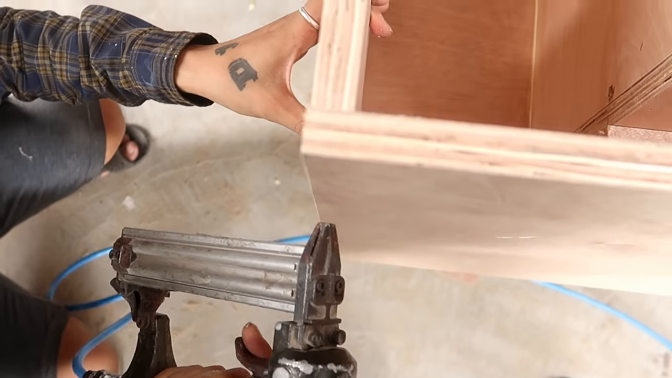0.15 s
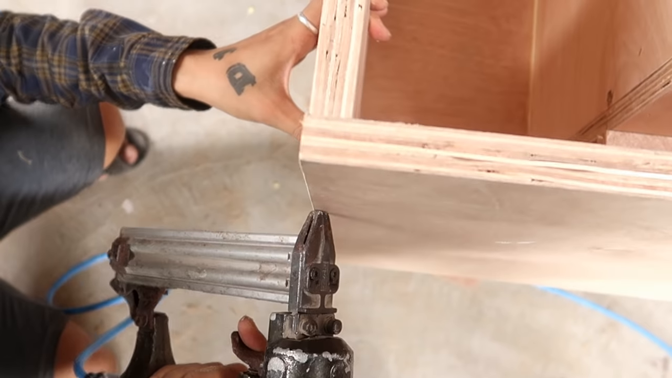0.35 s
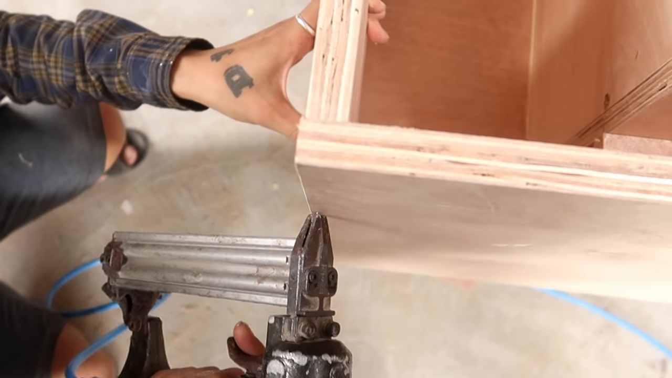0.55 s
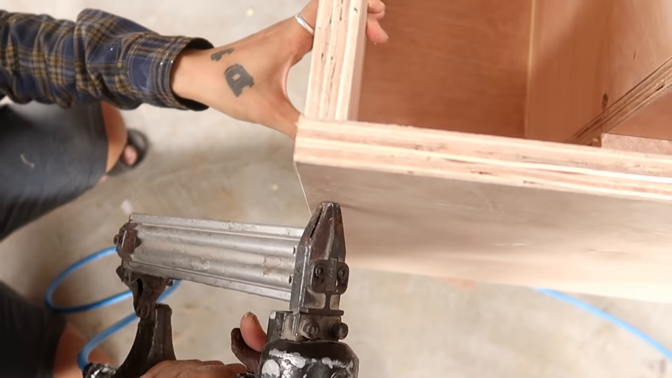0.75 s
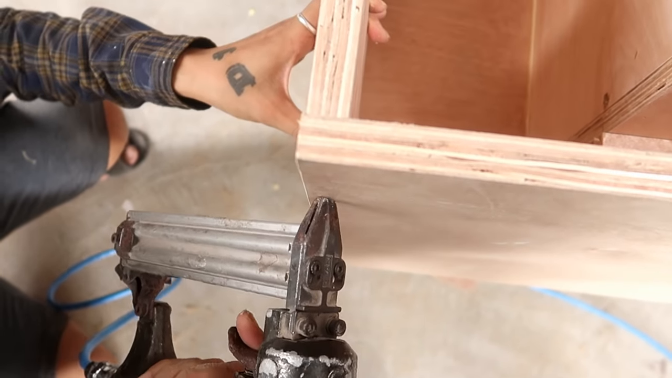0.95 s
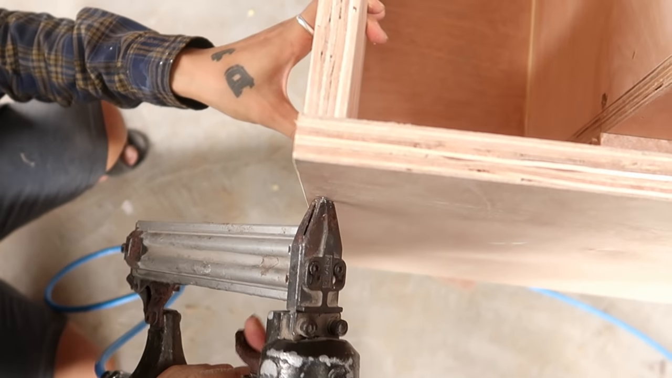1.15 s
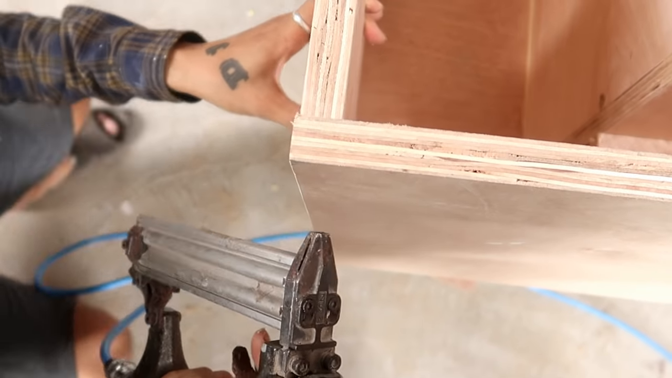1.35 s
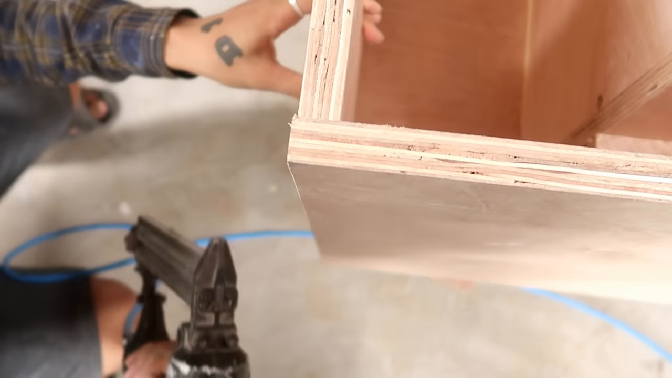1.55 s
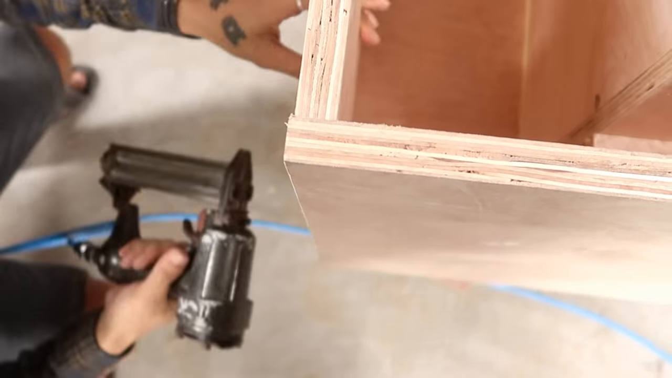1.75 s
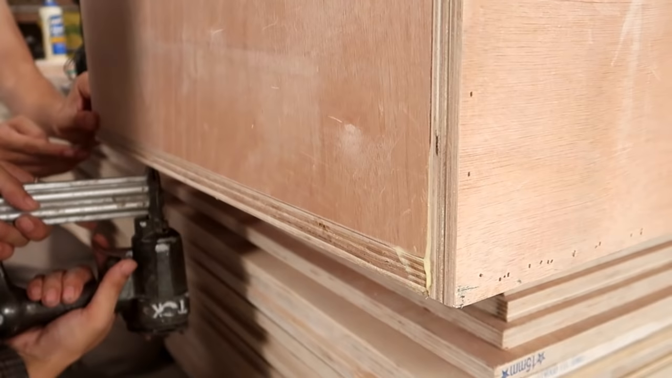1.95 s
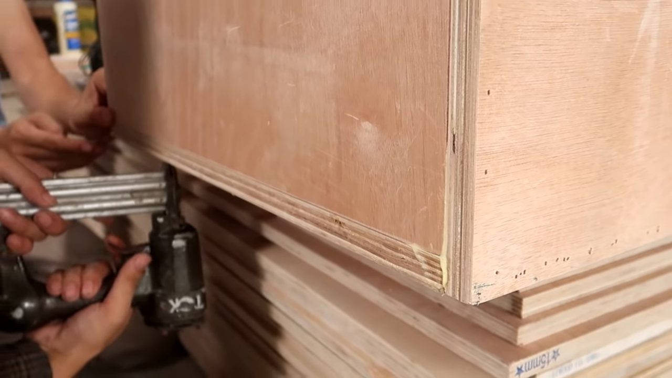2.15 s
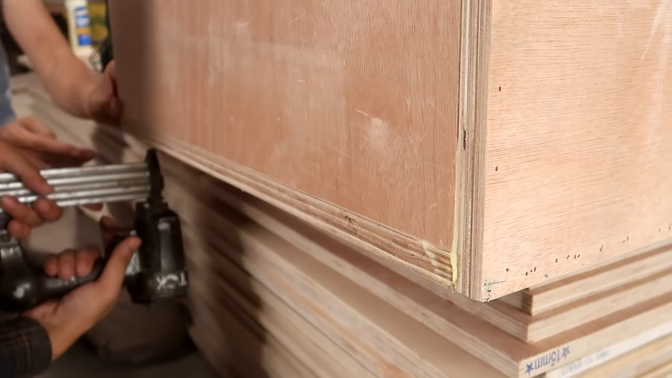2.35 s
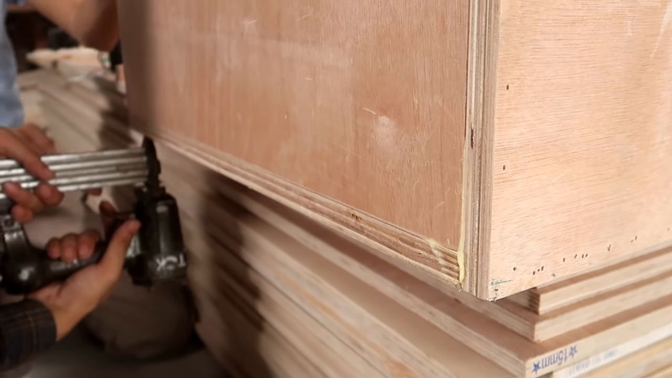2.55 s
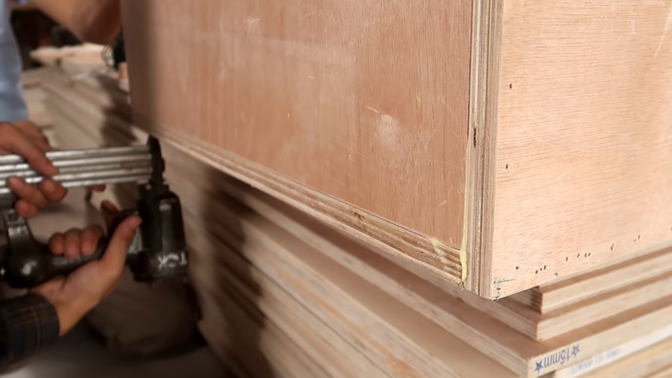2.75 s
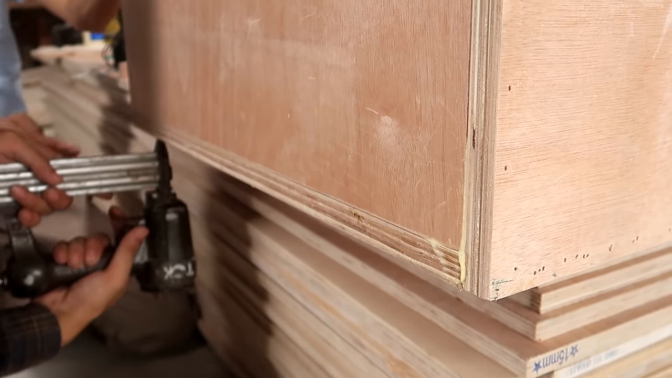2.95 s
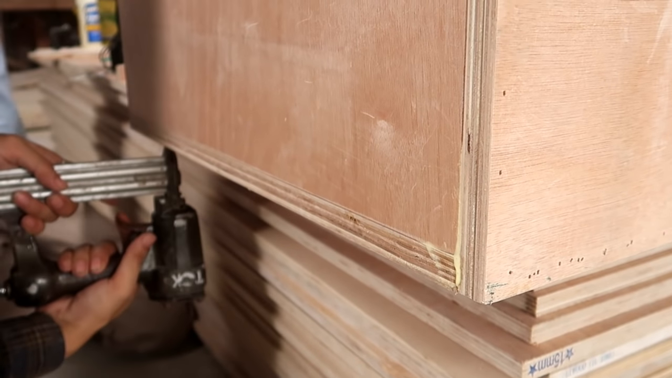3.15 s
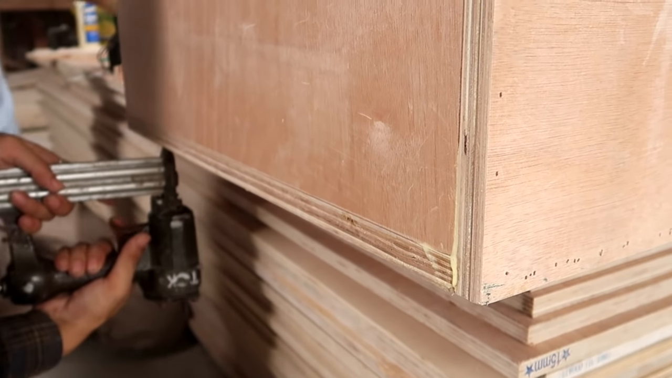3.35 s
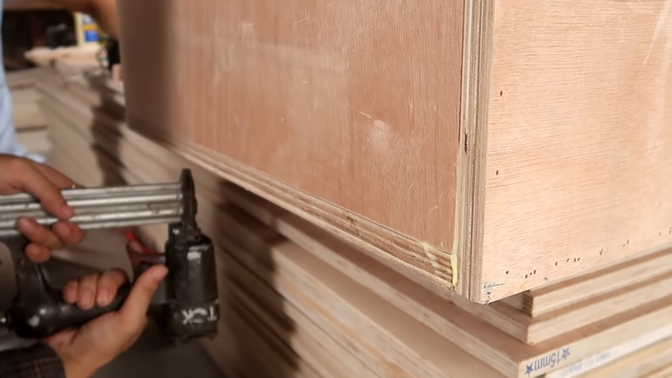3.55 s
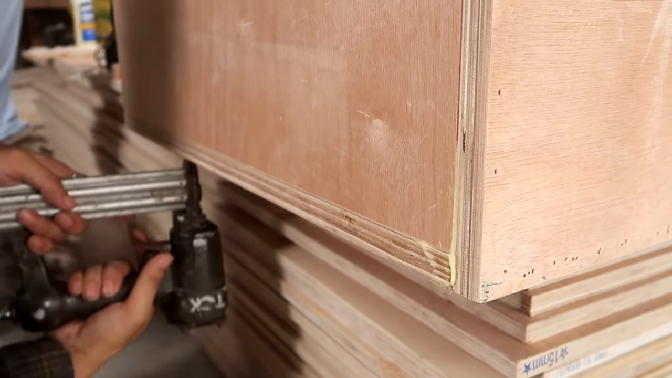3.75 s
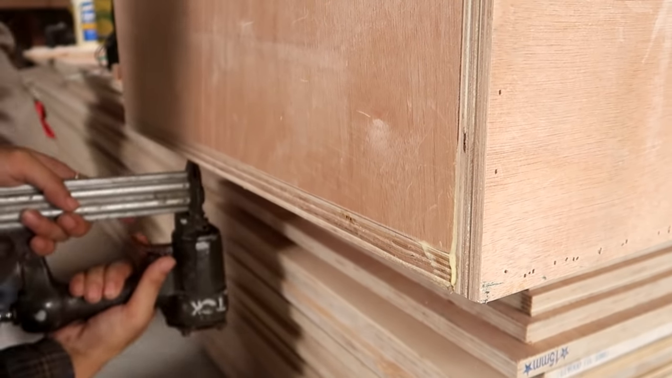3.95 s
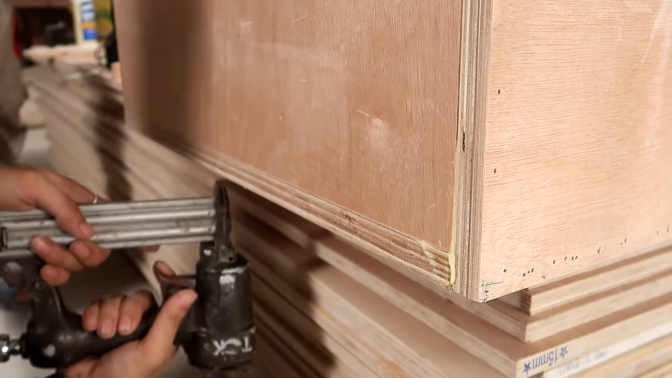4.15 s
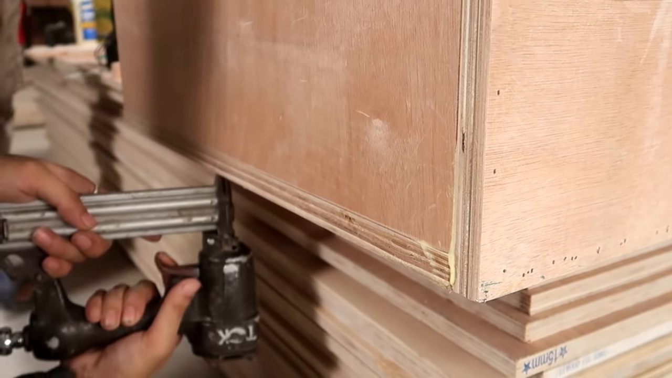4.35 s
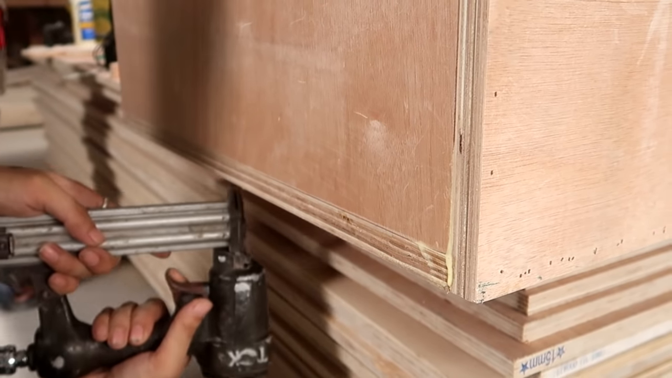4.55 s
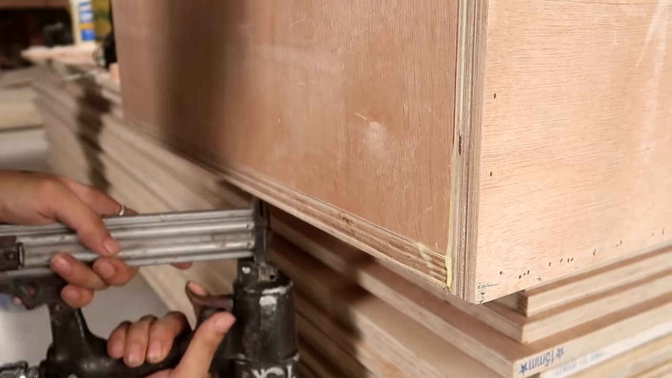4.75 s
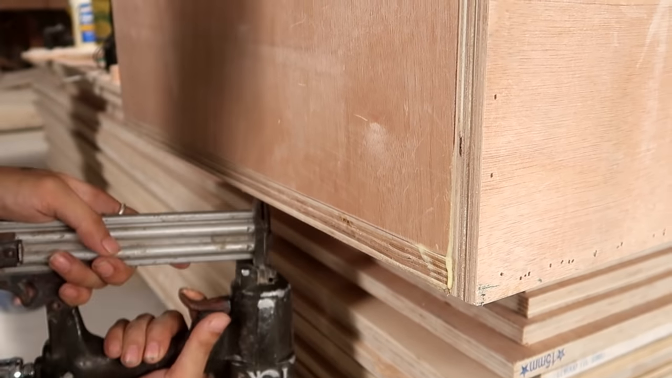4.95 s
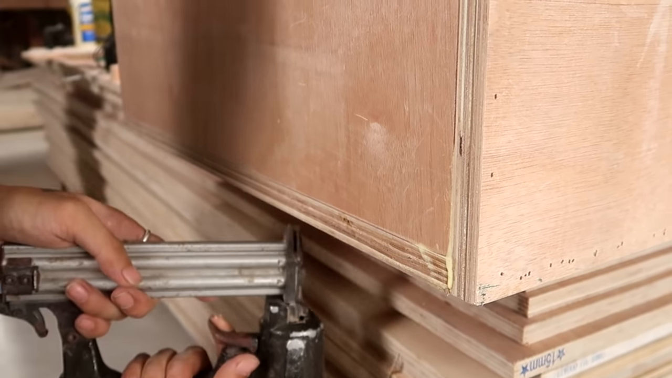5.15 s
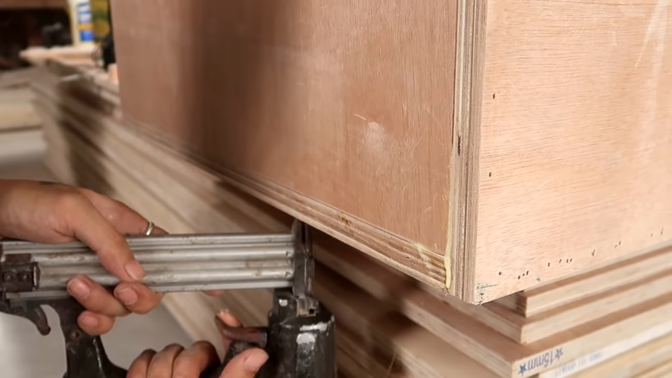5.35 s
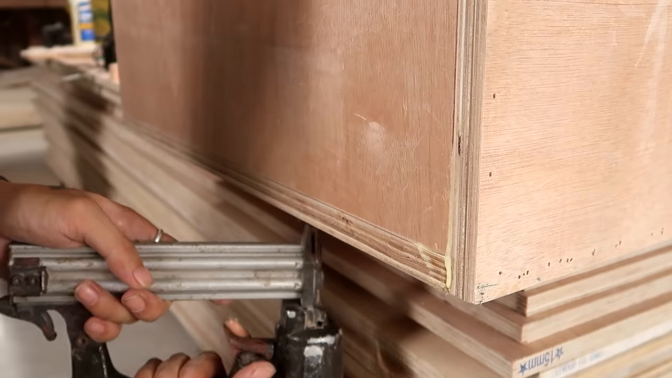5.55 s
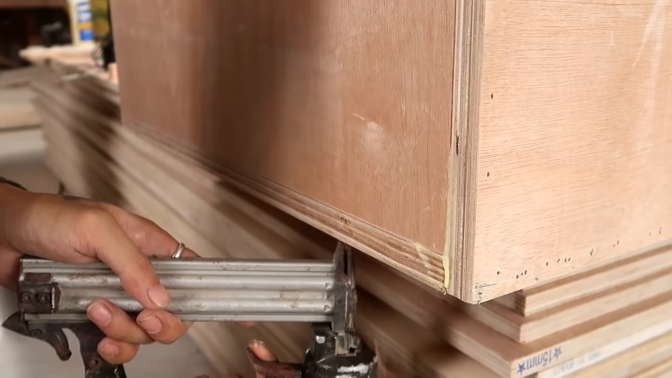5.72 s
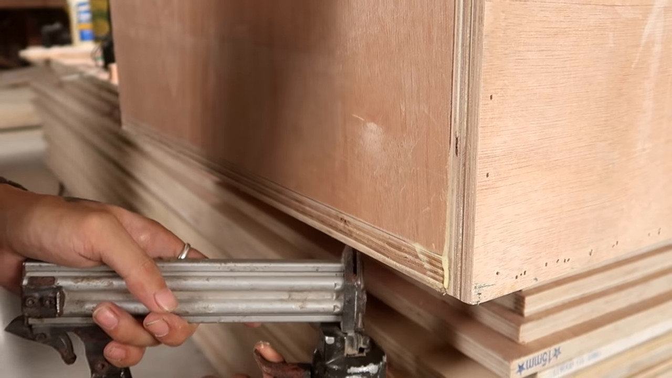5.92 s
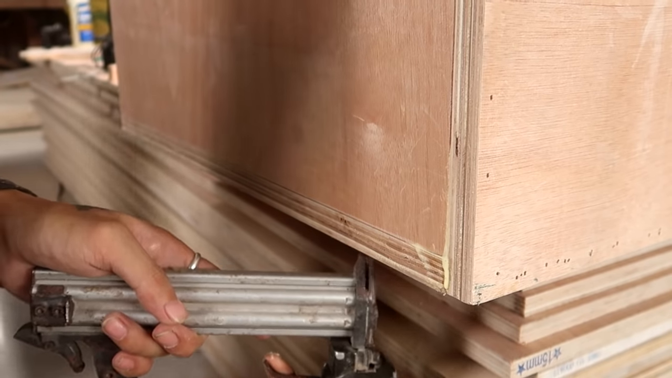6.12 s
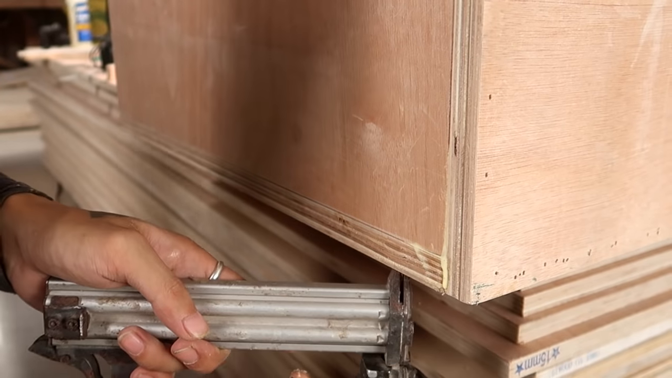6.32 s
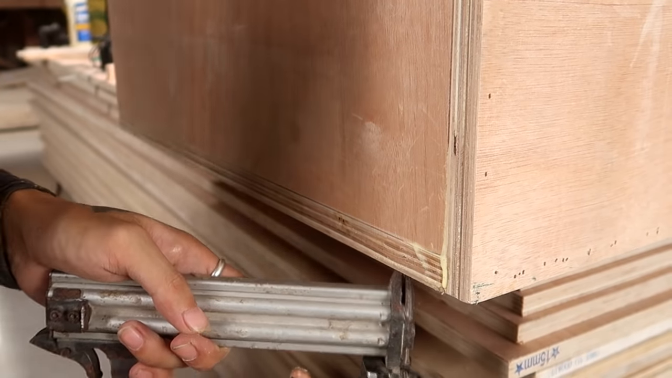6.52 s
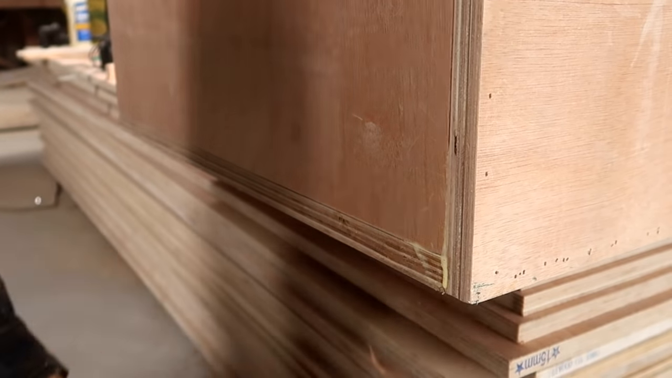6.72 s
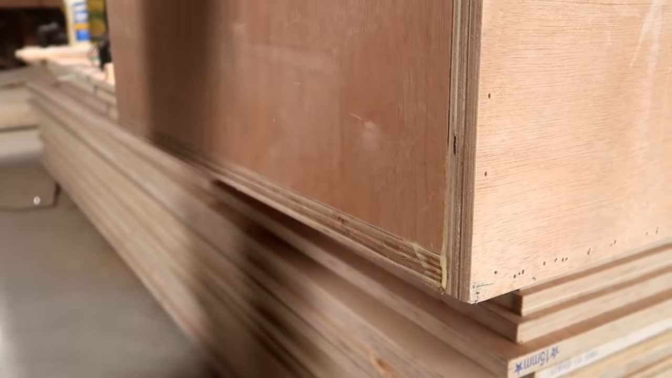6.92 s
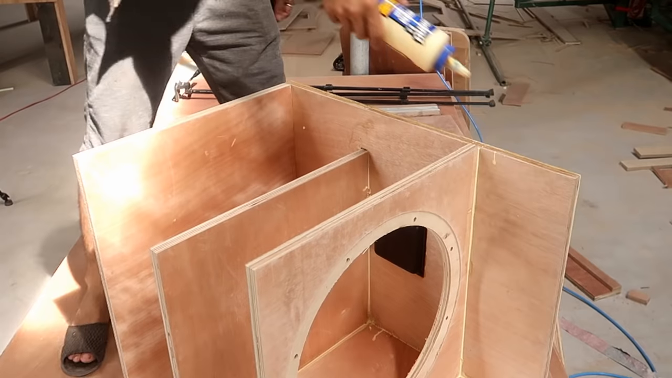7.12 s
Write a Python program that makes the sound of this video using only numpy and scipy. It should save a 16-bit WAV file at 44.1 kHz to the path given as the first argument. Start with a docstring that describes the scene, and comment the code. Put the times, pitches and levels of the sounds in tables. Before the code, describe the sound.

Pneumatic nail gun shots, roughly two a second, slam into plywood, each with a short hiss and a knocking air release, ringing through a large hall.

```python
"""Over faint shop hum a short hiss runs straight into the crack of an air nailer, close to a phone.
Twelve brads go into the edge of a plywood box in a large workshop. Each shot: the valve hisses, the driver
slams home and bounces, then the trigger is let go, air puffs out and the piston knocks back.
Wood and metal are decaying sines, air is shaped noise, and the hall is noise that follows their energy.
Small knocks, scrapes, faint hisses, gusts on the two microphone ports and a jolt of the phone lie around."""
import sys
import numpy as np
from scipy import signal
from scipy.fft import rfft, irfft
from scipy.io import wavfile
from scipy.ndimage import uniform_filter1d

SR = 44100
rng = np.random.default_rng(int(sys.argv[2]) if len(sys.argv) > 2 else 0)


def to_wav(sig):
    """Store sig (one row per channel, or 1-D mono) as 16-bit WAV at the path in sys.argv[1].

    Samples outside -1..1 are clipped; the rate is SR.
    """
    pcm = np.clip(np.atleast_2d(sig), -1, 1) * 32767
    pcm = np.round(pcm).astype(np.int16)
    wavfile.write(sys.argv[1], SR, pcm.T)  # frames by channels


N = 321048
T = np.arange(N) / SR

# driver blows: t/s, blow level/dB, left minus right/dB, lower spot ring f/Hz, its level/dB, # upper spot ring
# f/Hz, its level/dB, valve hiss level/dB, brightness/dB per octave, panel thud level/dB, # box ring level/dB,
# rebound delay/ms, rebound level/dB, first tick level/dB
SHOTS = [(0.0173, 4.5, -1.5, 1230, -11, 3100, 2, -26.5, 9.5, -47, 4, 2.4, 0, -9),
         (0.599, 2.5, 0, 1190, -2.5, 3410, -4, -31, 3, -39.5, -3, 2.42, -5.5, -12),
         (1.201, -1.5, 11, 836, -4, 2920, -8, -33, 1.5, -5, 2.5, 2.3, -4, -10.5),
         (2.2267, 4, 9.5, 890, -0.5, 3030, -0.5, -16, -1, -33, 5, 2.3, -6, -24),
         (2.9069, 1, 15, 1070, -1.5, 1980, 1, -21.5, 2.5, -39.5, -7, 2.18, -0.5, -18),
         (3.445, -1, -3.5, 1010, 0, 3060, 3, -23.5, 3, -34, -1.5, 1.78, -7, -17.5),
         (3.9937, 2.5, 6, 1050, 4.5, 2270, 2, -24.5, -1.5, -31, -6.5, 2.1, -3.5, -23),
         (4.542, -10.5, -2.5, 1700, 6.5, 2870, 7, -28.5, -0.5, -30.5, -9.5, 3, -3.5, 1),
         (5.058, 0, -7.5, 1017, -1, 2190, 1, -28.5, -1.5, -32, -3.5, 2.1, -10, -23),
         (5.582, -5.5, -6.5, 1350, -7, 2330, 3.5, -28, 0, -12, 0.5, 2.25, -6, -13),
         (6.14, 3, 2, 1320, 3, 2280, 0, -25, 1, -19, -0.5, 2.38, -7, -16),
         (6.573, 0.5, -8.5, 1385, 1, 1980, -10, -27, 4, -22, 2.5, 2.28, -7, -25)]
# modes of box and gun body: f/Hz, level/dB, t60/s (before scatter from blow to blow)
BODY_MODES = [(257, -13, 0.081), (462, -4.5, 0.022), (916, 1.5, 0.043), (1205, 1, 0.014), (1400, -1, 0.066),
              (2100, -10, 0.0057), (2120, -8, 0.013), (3020, -11, 0.01), (3630, -11, 0.016),
              (4500, -16.5, 0.0037), (5030, -11, 0.008)]
SEEP_DB, SEEP_S = -15, 0.0069  # air seeps past the seal just before valve or port opens
KNOCK_LAG_MS_PER_DB = 0.23  # the louder port hears knocks and thumps earlier


def undb(db):
    """Amplitude ratio of a level in dB."""
    return 10 ** (np.asarray(db) / 20)


def curve(table):
    """Gain at every sample from t/s, level/dB rows."""
    return undb(np.interp(T, *np.transpose(table)))


def colour(x, points):
    """Shape the spectrum along the last axis by f/Hz, level/dB points, then scale to rms 1."""
    hz, db = np.transpose(points)
    f = np.maximum(np.fft.rfftfreq(x.shape[-1], 1 / SR), 1)
    gain = undb(np.interp(np.log(f), np.log(hz), db))
    y = irfft(rfft(x) * gain, x.shape[-1])
    return y / np.sqrt(np.mean(y ** 2))


def ring(t, hz, t60, phase=0.):
    """A mode struck at t = 0: a sine that falls 60 dB in t60 seconds."""
    decay = undb(-60 * np.maximum(t, 0) / t60)
    return (t >= 0) * np.sin(2 * np.pi * hz * t + phase) * decay


def walk(rate):
    """Smoothed random steps, rate a second, separate per channel, with spread 1."""
    k = int(SR / rate)
    steps = np.repeat(rng.standard_normal((2, N // k + 1)), k, axis=1)
    smooth = uniform_filter1d(steps, k)[:, :N]
    return smooth / smooth.std()


def add(out, s, sound, pan_db=0., lead_ms=0.):
    """Mix in at s; pan_db is left minus right level, lead_ms how much earlier the left port hears it."""
    stereo = np.broadcast_to(sound, (2, sound.shape[-1]))
    for ch, side in enumerate((1, -1)):
        i = int((s - side * lead_ms / 2000) * SR)
        part = stereo[ch, max(-i, 0):N - i]
        start = max(i, 0)
        out[ch, start:start + len(part)] += part * undb(side * pan_db / 2)


def shop():
    """Distant machines: diffuse coloured noise whose low and high parts waver separately."""
    # background spectrum: f/Hz, relative level/dB per Hz
    hum_spectrum = [(18, -35.5), (30, -21.5), (65, -9.5), (608, -10.5), (728, -10), (827, -10.5),
                    (1420, -17), (1700, -16.5), (4070, -31.5), (11500, -44.5), (13500, -67.5), (16000, -77)]
    # background level before wavering, stepping up where the phone moves: t/s, level/dB
    background = [(0.0, -60.5), (1.35, -59.5), (1.55, -64), (1.99, -60), (2.01, -57), (3.13, -53),
                  (5.17, -57), (7.04, -54), (7.17, -49.5), (7.28, -33.5)]
    hum = colour(rng.standard_normal((2, N)), hum_spectrum)
    low = signal.sosfilt(signal.butter(2, 700, fs=SR, output="sos"), hum)
    high = hum - low
    return curve(background) * (low * undb(4.4 * walk(27)) + high * undb(2.3 * walk(42)))


def gusts():
    """Turbulence rumbles on each port by itself, in uneven lumps; a draught follows every shot."""
    # air moving over the ports, before draughts and lumps: t/s, level/dB
    wind = [(0, -65), (.25, -69.5), (1.0, -74.5), (1.7, -79.5), (1.998, -71.5), (2.008, -40), (2.05, -38),
            (2.117, -41), (2.177, -39), (2.21, -42), (2.3, -48), (2.45, -60), (2.8, -51), (3.3, -58),
            (3.85, -52.5), (4.35, -64.5), (4.7, -59), (4.95, -56), (5.35, -55), (5.95, -68), (6.28, -42.5),
            (6.5, -68), (7.0, -57), (7.17, -56), (7.2, -47), (7.28, -47)]
    draught_db, rise_s, fade_s = -49.5, .03, 0.062  # each shot stirs the air at the phone
    after = np.maximum(T - np.array(SHOTS)[:, :1], 0)
    draught = ((1 - np.exp(-after / rise_s)) * np.exp(-after / fade_s)).sum(axis=0)
    spectrum = [(15, 4.5), (40, -1.5), (90, 5.0), (200, -4.0), (500, -17.5), (1500, -58.5), (5000, -95.5)]
    rumble = colour(rng.standard_normal((2, N)), spectrum)
    lumps = undb(4.5 * walk(10) + 1.7 * walk(39))
    return (curve(wind) + undb(draught_db) * draught) * lumps * rumble


def hall(x):
    """Diffuse tail, unrelated left and right: each band's energy builds over first reflections, then dies."""
    # reverberation bands: f/Hz, t60/s, relative level/dB (before lumps)
    bands = [(87, 0.92, -9), (210.9, 0.4, -1), (420, .5, -2.5), (779, 0.53, -6.5), (1109, 0.46, -3.5),
             (1960, 0.44, 1), (2750, .33, -2), (3727, 0.32, 0), (5095, 0.42, -1), (7000, 0.35, -2.5),
             (9030, 0.28, -5), (10350, 0.38, -12), (12600, 0.26, -7.5)]
    # hall level as heard from each place of the phone: from t/s, level/dB
    places = np.array([(0, -1.5), (2.0, 2.5), (7.172, -29)])
    ripple_db, ripple_hz, build_s = 2.5, 45, 0.00039  # uneven room resonances: depth, spacing; build-up time
    out, lumps = 0, walk(35)
    spots = np.arange(40, SR / 2, ripple_hz)
    diffuse = []
    for _ in range(2):
        ripple = np.c_[spots, ripple_db * rng.standard_normal(len(spots))]
        diffuse.append(colour(rng.standard_normal(N), ripple))
    diffuse = np.array(diffuse)
    for hz, t60, db in bands:
        band = signal.butter(2, [hz / 1.3, hz * 1.3], "bandpass", fs=SR, output="sos")
        energy = np.mean(signal.sosfilt(band, x) ** 2, axis=0)
        # one smoothing for the decay (energy falls 60 dB in t60), one for the build-up
        for keep in (undb(-120 / t60 / SR), np.exp(-1 / (build_s * SR))):
            energy = signal.lfilter([1 - keep], [1, -keep], energy)
        noise = signal.sosfilt(band, diffuse)
        # scattered reflections make the decay lumpy
        gain = undb(db + 2.1 * walk(70) + 1.3 * lumps)
        out = out + gain * np.sqrt(energy) * noise / noise.std()
    return out * undb(places[np.searchsorted(places[1:, 0], T), 1])


def rustle(events, points, grain_db):
    """Grainy noise that swells in, changes level at a steady dB rate and stops."""
    gain = 0
    for s, swell, length, db, fade in events:
        shape = np.clip((T - s) / swell, 0, 1) * (T < s + length)
        gain = gain + shape * undb(db + fade * np.clip(T - s, 0, length))
    return gain * undb(grain_db * walk(66)) * colour(rng.standard_normal((2, N)), points)


def faint_hisses():
    """Short faint hisses: lightly grainy noise with most of its energy in the treble."""
    # start t/s, swell/s, length/s, level before grain/dB, level change/dB per s
    hisses = [(4.95, 0.055, 0.092, -48, -39.5), (5.97, 0.048, 0.22, -60.5, -90),
              (7.036, 0.0086, 0.072, -55.5, -150)]
    # hiss spectrum: f/Hz, relative level/dB per Hz
    hiss_spectrum = [(880, -33), (1500, -7), (2360, -5), (3540, -8), (4500, -0.5), (5200, -11),
                     (11500, -19), (15000, -27)]
    return rustle(hisses, hiss_spectrum, 0.43)


def slides():
    """Something slides on wood: strongly grainy noise, darker than the hisses."""
    # start t/s, swell/s, length/s, level before grain/dB, level change/dB per s
    scrapes = [(2.008, 0.0026, 0.21, -46, 10), (7.181, 0.0022, .1, -37.5, -92)]
    # scrape spectrum: f/Hz, relative level/dB per Hz
    scrape_spectrum = [(240, -22), (400, -10.5), (437, -10.5), (725, -9), (1010, -15.5), (1260, -15.5),
                       (3670, -29), (4130, -29), (7000, -47), (12000, -58.5), (14000, -77.5)]
    return rustle(scrapes, scrape_spectrum, 4.06)


def bump():
    """The phone is jolted: a sudden pressure drop that eases, dips once more and settles."""
    peak_db = np.array([-14.5, -12.5])  # left, right
    start_s, quick_s, slow_s = 7.181, 0.011, 0.019
    swing, swing_s = 0.42, 0.033  # share and delay of the second dip
    u = np.maximum(T - start_s, 0)
    settle = np.exp(-(u / quick_s) ** 2) + swing * np.exp(-((u - swing_s) / slow_s) ** 2)
    return -undb(peak_db)[:, None] * (1 - np.exp(-u / 0.00051)) * settle


def thumps(near):
    """Lumps of air on the ports: a cycle or two of low pressure each, as a heavily damped sine."""
    # t/s, level/dB, left minus right/dB, f/Hz
    lumps = [(2.0099, -17.5, 2.5, 160), (2.019, -20, -2.5, 150), (2.0363, -13, 2.5, 124),
             (2.058, -19, 8, 106.4), (2.0698, -17.5, 5, 80), (2.135, -21, -13, 56), (2.150, -20.5, 6, 111),
             (2.1718, -14, 7, 117), (2.188, -21, -2, 71), (2.766, -41.5, -4, 96), (2.808, -41, -1, 79),
             (2.832, -27.5, -3, 106), (2.852, -27, -4, 139), (2.872, -32, 0, 75.3), (3.824, -44, -3, 90.5),
             (3.845, -37.5, 1, 129), (3.858, -37.5, 5, 130), (3.941, -39, -2, 132), (5.309, -42, -1.5, 130),
             (5.401, -40, -1, 129), (5.414, -44, -2, 124.4), (5.43, -39.5, 1, 155), (5.478, -39, -1, 116)]
    t = np.arange(4096) / SR
    for s, db, pan_db, hz in lumps:
        sound = ring(t, hz, 5.5 / hz) * np.clip(4.6 * t * hz, 0, 1)
        add(near, s, undb(db) * sound, pan_db, KNOCK_LAG_MS_PER_DB * pan_db)


def knocks(near, far):
    """Small knocks of wood and tools: one short ring each, with a dry click of the wood."""
    # t/s (heard near 1.1 ms later), level/dB, left minus right/dB, f/Hz, click level/dB, send to hall/dB
    hits = [(0.408, -40.5, -7.5, 221, -27, 0), (0.883, -33, 2, 245, -27.5, -11),
            (0.917, -45, 9, 630, -24, -9), (0.964, -34.5, 8.5, 1970, -24, -4.5),
            (0.964, -44, 3.5, 3530, -13, 0), (0.969, -44, 2.5, 1855, -25, -12),
            (1.02, -38.5, -13, 237, -21, 0), (1.109, -43.5, 1, 762, -21, -15.5),
            (1.128, -36, 4, 762, -25.5, -6.5), (2.088, -25.5, 1, 665, -19.5, 2),
            (2.101, -27.5, 1, 716, -28, -12), (2.127, -28, 0.5, 750, -17.5, -15.5),
            (2.184, -31, 1, 700, -25, -5.5), (2.242, -18.5, 0, 513, 3, -2.5),
            (2.842, -31.5, -0.5, 255, -14.5, 0.5), (3.214, -35.5, 1, 487, -26, -3.5),
            (3.854, -44, -0.5, 207, -30, -11), (4.078, -28.5, -1.5, 830, -21, -14.5),
            (4.149, -38, 0.5, 850, 3, -11.5), (5.399, -42, 2.5, 245, -22.5, -19),
            (5.473, -48.5, -4, 203, -26, -10.5), (5.511, -39.5, 0.5, 793, -25, 8),
            (5.519, -42, 1.5, 704, -23, -1), (6.334, -32, -2, 193, -10, -17),
            (6.408, -36, 1, 4100, -22, -20), (6.984, -37.5, -8, 2190, -4, -5),
            (7.038, -34.5, 4, 367, -8.5, -7), (7.099, -20.5, 4, 1650, -9.5, 1),
            (7.1105, -7, 5.5, 1120, -10.5, -7), (7.111, -17.5, 6.5, 1480, -1, -4.5),
            (7.1122, -13, 2, 2530, -9, -7), (7.146, -23.5, 12.5, 776, -15, -18)]
    # dry wood click: f/Hz, relative level/dB per Hz
    click_spectrum = [(300, 4.5), (1200, 8.5), (3000, -1.5), (7000, -12.5), (15000, -42.5)]
    t = np.arange(4096) / SR
    for s, db, pan_db, hz, click_db, hall_db in hits:
        click = colour(rng.standard_normal(len(t)), click_spectrum) * np.exp(-t / 0.003)
        tone = ring(t, hz, 14 / hz) * np.clip(t * hz, 0, 1)
        sound = undb(db) * (tone + undb(click_db) * click)
        add(near, s + 0.0011, sound, pan_db, KNOCK_LAG_MS_PER_DB * pan_db)
        add(far, s, undb(hall_db) * sound)


def puffs(near, far):
    """The exhaust port opens: a jet swells with a low whump until the returning piston knocks and shuts it."""
    # t/s, puff level/dB, left minus right/dB, whump level/dB, whump f/Hz, knock ring f/Hz, port open/ms,
    # piston knock level/dB, upper knock ring f/Hz, its level/dB against the knock ring
    exhausts = [(0.101, -11.5, 1, 2, 218, 950, 9.1, -5, 3760, 1),
                (0.6863, -12, -0.5, -4, 111, 990, 6.6, -4, 3620, -6.5),
                (1.2859, -11.5, -1.5, -4, 87.4, 1012, 6.6, -10.5, 5910, -7),
                (2.2967, -7, 4, -2.5, 191, 996, 8.9, -5, 1590, -4),
                (2.9613, -9.5, -0.5, -6.5, 117.5, 980, 8.1, -1, 6300, 2),
                (3.5041, -9.5, 4.5, -8.5, 95.4, 1016, 8.5, -4, 1290, 2),
                (4.0563, -9.5, 5, -6.5, 77, 925, 7, -3.5, 5160, -5),
                (4.6036, -11, 4, -5, 113.5, 947, 7.9, -4.5, 5470, -5),
                (5.129, -10, -1, -5.5, 94.7, 885, 6.2, 1, 2260, -1),
                (5.6483, -11.5, -0.5, -5, 98.7, 884, 6.3, -4, 5000, -23),
                (6.2025, -11.5, -0.5, -8, 92.5, 860, 8.4, -3, 1500, -13),
                (6.6418, -9.5, -0.5, -7, 101, 850, 5, -2, 2300, -4)]
    # jet spectrum: f/Hz, relative level/dB per Hz
    jet_spectrum = [(180, -31), (300, -2), (614, 3), (1410, -2), (4990, -2.5), (5610, -1.5), (7950, -8.5),
                    (12900, -11.5), (16000, -30)]
    jet_db, hall_db, lag_ms_per_db = -7, -16.5, 0.55  # the louder port also hears the puff earlier
    jet_rise_s, jet_fade_s, jet_shut_s = .0018, 0.011, .003
    before_s = .01
    t = np.arange(4096) / SR - before_s
    for s, db, pan_db, whump_db, whump_hz, knock_hz, open_ms, piston_db, upper_hz, upper_db in exhausts:
        chance = rng.standard_normal(len(BODY_MODES) + 2)
        shut = t - open_ms / 1000
        swell = np.minimum(t - .0012, 0) / jet_rise_s
        fade = np.maximum(t - .0012, 0) / jet_fade_s + np.maximum(shut - .001, 0) / jet_shut_s
        flow = np.exp(swell - fade) + undb(SEEP_DB) * np.exp(-np.abs(t) / SEEP_S)
        jet = flow * colour(rng.standard_normal((2, len(t))), jet_spectrum)

        # the whump reaches the two ports out of step
        phase = .5 * chance[-2:, None]  # radians
        whump = ring(t + 0.0017, whump_hz, 5 / whump_hz, phase) * np.clip((t + 0.0018) / 0.0025, 0, 1)

        # the body modes die sooner than in a blow and alternate in sign
        knock = 0
        for k, ((f, g, t60), d) in enumerate(zip(BODY_MODES, chance)):
            knock = knock + (-1) ** k * undb(g + 2.6 * d) * ring(shut, f * (1 + 0.025 * d), 0.6 * t60)
        piston_rings = ring(shut, knock_hz, 0.02) + undb(upper_db) * ring(shut, upper_hz, 0.016)
        knock = knock + undb(2.0) * piston_rings
        knock = knock / np.abs(knock).max()

        sound = undb(jet_db) * jet + undb(whump_db) * whump + undb(piston_db) * knock
        add(near, s - before_s, undb(db) * sound, pan_db, lag_ms_per_db * pan_db)
        # the hall gets every puff at the same level
        add(far, s - before_s, undb(hall_db) * sound)


def shots(near, far):
    """Valve hiss, a tick, a push, then the driver slams home and rebounds; the pressed nose stills the wood."""
    # timing of each shot: left port leads/ms, valve opens before the blow/ms
    leads = [(.3, 17), (0, 18.5), (1.3, 18), (1.6, 14), (3, 13.5), (-1, 14), (.7, 14.5), (-2, 11),
             (-.7, 11.5), (-.6, 14), (.9, 14.5), (-1.9, 14.5)]
    # wood splitting round the brad: f/Hz, relative level/dB per Hz
    crack_spectrum = [(150, -26), (350, 2.5), (1500, 0.5), (5000, -3.5), (10000, -14), (16000, -31)]
    # valve hiss: f/Hz, relative level/dB per Hz
    valve_spectrum = [(290, -30.5), (500, -0.5), (974, -7.5), (3390, -2), (5800, -6.5), (7100, -2),
                      (7750, -6.5), (16000, -18)]
    tick_lead_s, last_s, last_db = 0.0022, 0.0048, -5  # light tick before the blow, last bounce after it
    crack_db, crack_fade_s, ring_scatter = 2.5, 0.0033, .025
    stilled_s, stilling_s = 0.0038, 0.00063  # when and how quickly the wood is stilled
    push_db, push_s, release_s = -2, 0.00036, .00012  # the panel is pushed away as the brad sinks in
    panel_hz, panel_t60_s = 186, 0.01  # the big panel's thud
    box_hz, box_t60_s = 482, 0.02  # the box's low ring, stronger at some spots
    valve_rise_s, valve_fade_s = .001, 0.017
    blow_hall_db, valve_hall_db = -8, -10.5
    before_s = .024
    t = np.arange(2048) / SR - before_s
    for (s, db, pan_db, low_hz, low_db, high_hz, high_db, valve_db, bright_db, thud_db, box_db,
         again_ms, again_db, tick_db), (lead_ms, valve_ms) in zip(SHOTS, leads):
        contacts = [(-tick_lead_s, tick_db), (0, 0), (again_ms / 1000, again_db), (last_s, last_db)]
        # every spot on the edge adds two rings of its own and drives the low ring differently
        spot = [(low_hz, low_db, .018), (high_hz, high_db, .012), (box_hz, box_db, box_t60_s)]
        scatter = rng.standard_normal((len(contacts), len(BODY_MODES)))
        blow = 0
        for (late, size_db), draw in zip(contacts, scatter):
            u = t - late
            body = 0
            for (f, g, t60), d in zip(BODY_MODES, draw):
                tilted_db = g + bright_db * np.log2(f / 1000)
                body = body + undb(tilted_db) * ring(u, f * (1 + ring_scatter * d), t60)
            for f, g, t60 in spot:
                body = body + undb(g) * ring(u, f, t60)
            crack = colour(rng.standard_normal(len(t)), crack_spectrum)
            crack = crack * (u >= 0) * np.exp(-np.maximum(u, 0) / crack_fade_s)
            blow = blow + undb(size_db) * (body + undb(crack_db) * crack)
        blow = blow / np.abs(blow).max() / (1 + np.exp((t - stilled_s) / stilling_s))
        push = np.exp(np.minimum(t, 0) / push_s - np.maximum(t, 0) / release_s)
        blow = blow - undb(push_db) * push
        blow = blow + undb(thud_db) * ring(t, panel_hz, panel_t60_s)

        opened = t + valve_ms / 1000
        since = np.maximum(opened, 0)
        flow = (1 - np.exp(-since / valve_rise_s)) ** 3 * np.exp(-since / valve_fade_s)
        flow = flow + undb(SEEP_DB) * np.exp(-np.abs(opened) / SEEP_S)
        valve = undb(valve_db) * flow * colour(rng.standard_normal((2, len(t))), valve_spectrum)

        add(near, s - before_s, undb(db) * blow, pan_db, lead_ms)
        add(near, s - before_s, valve)
        # the hall gets every blow at the same level
        add(far, s - before_s, undb(blow_hall_db) * blow + undb(valve_hall_db) * valve)


def scene():
    """Sum the direct sound at the ports, the hall's answer, the background and the phone's own disturbances."""
    near, far = np.zeros((2, 2, N))
    knocks(near, far)
    puffs(near, far)
    shots(near, far)
    # the direct sound carries no deep bass below about 55 Hz
    near = signal.sosfilt(signal.butter(2, 55, "highpass", fs=SR, output="sos"), near)
    thumps(near)
    return shop() + gusts() + hall(far) + faint_hisses() + slides() + bump() + near


def record(dry):
    """The phone flattens the loudest peaks towards a ceiling and cuts the top steeply."""
    ceiling, top_hz = .8, 16100
    flat = dry / (1 + (dry / ceiling) ** 4) ** (1 / 4)
    # 0.3 dB ripple below the cut, 90 dB down above it
    return signal.sosfilt(signal.ellip(14, .3, 90, top_hz, fs=SR, output="sos"), flat)


dry = scene()
out = record(dry)
to_wav(out)
```